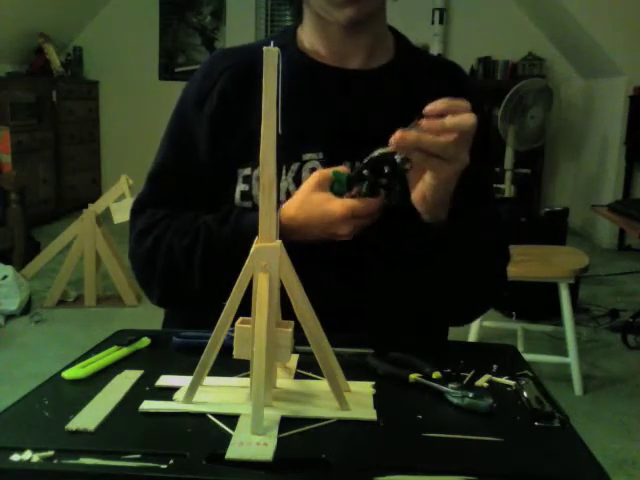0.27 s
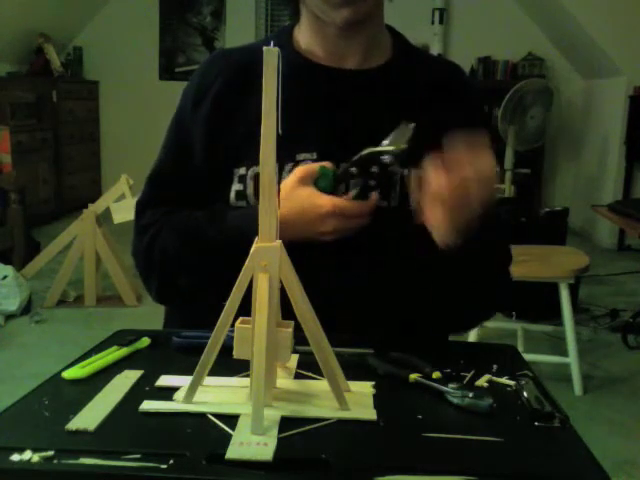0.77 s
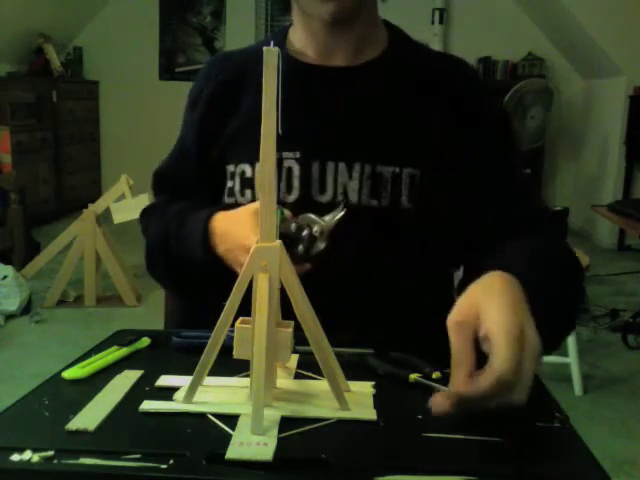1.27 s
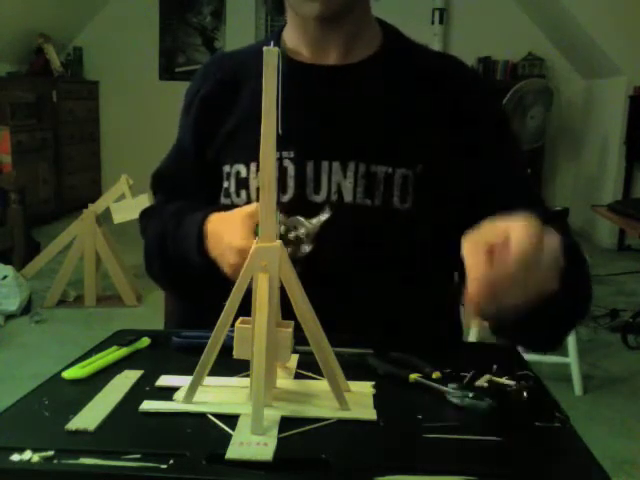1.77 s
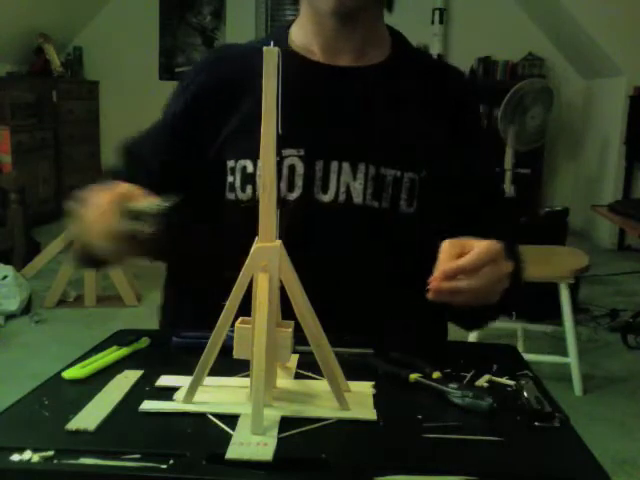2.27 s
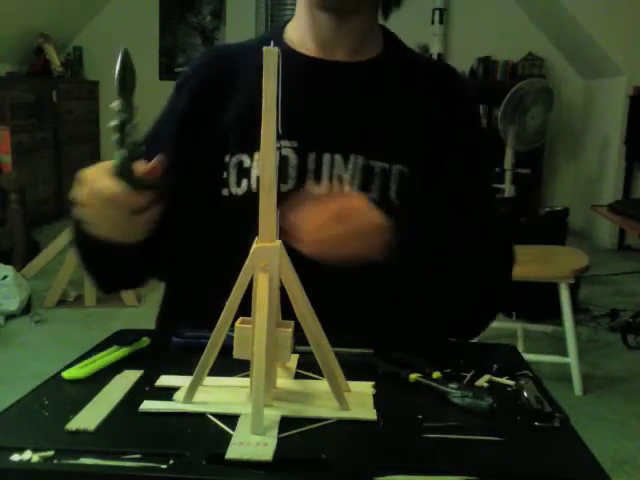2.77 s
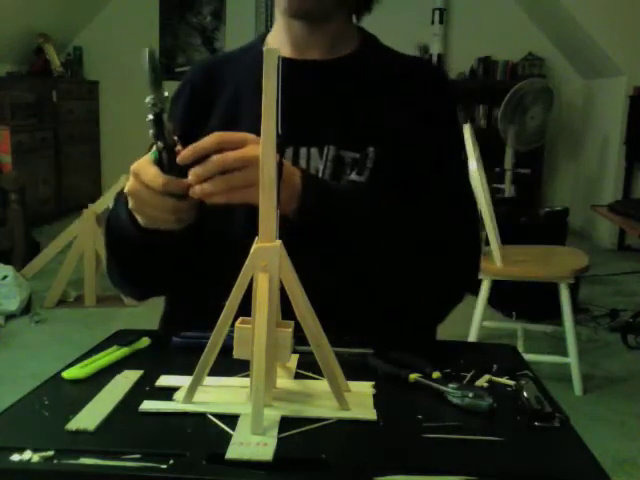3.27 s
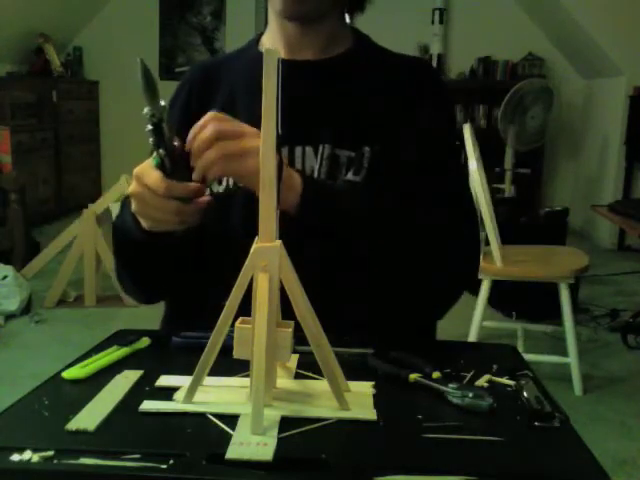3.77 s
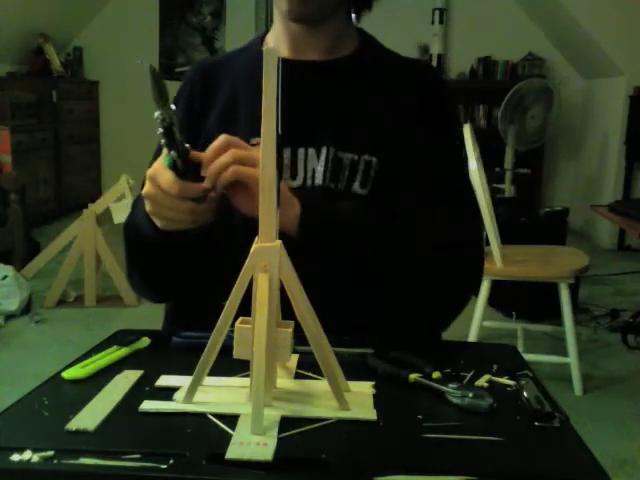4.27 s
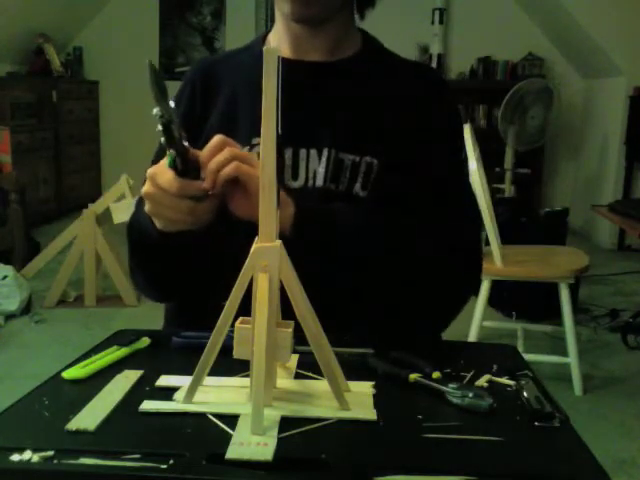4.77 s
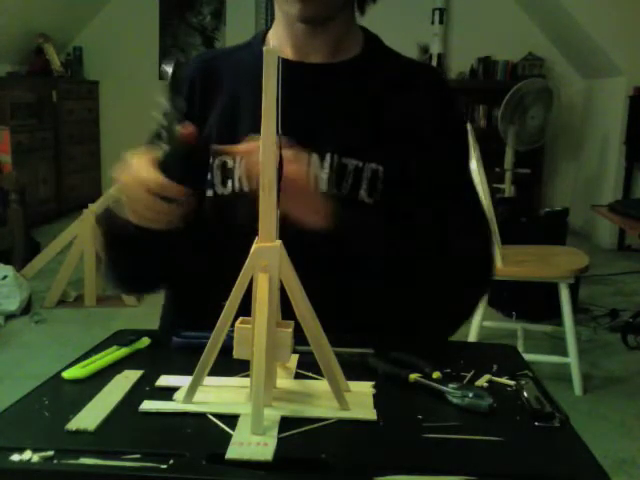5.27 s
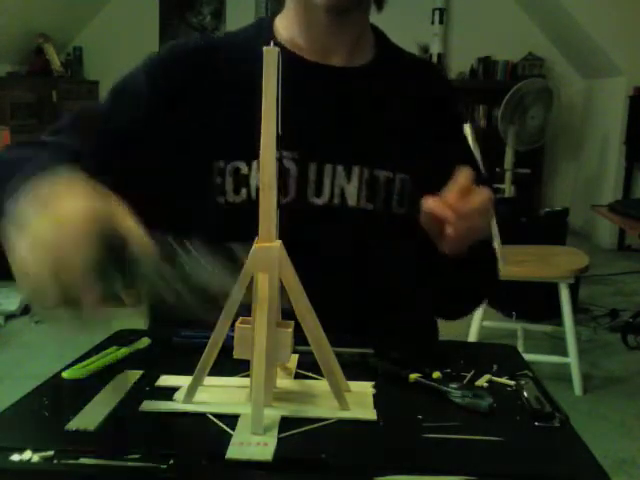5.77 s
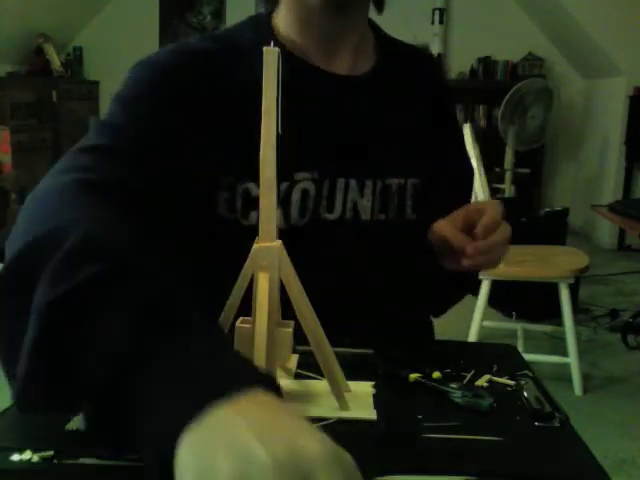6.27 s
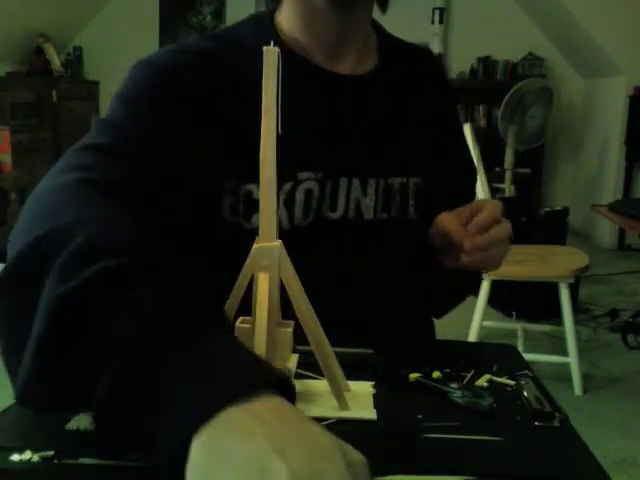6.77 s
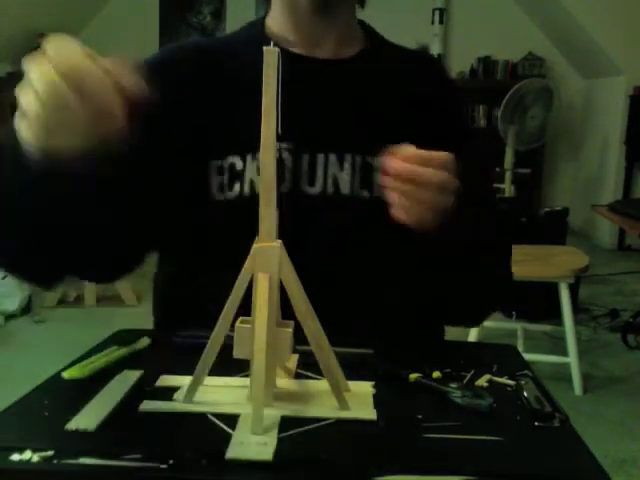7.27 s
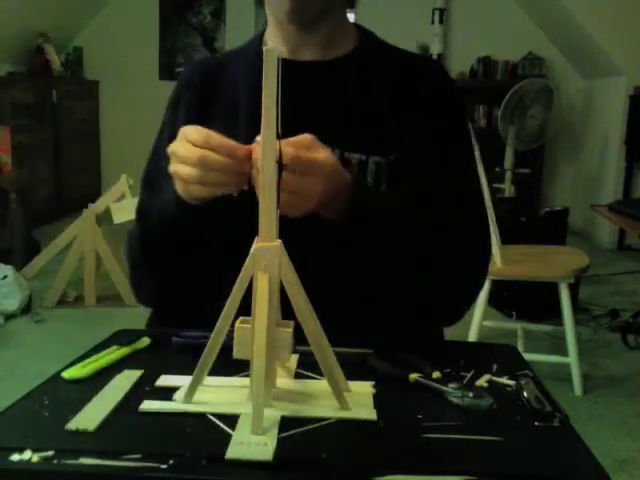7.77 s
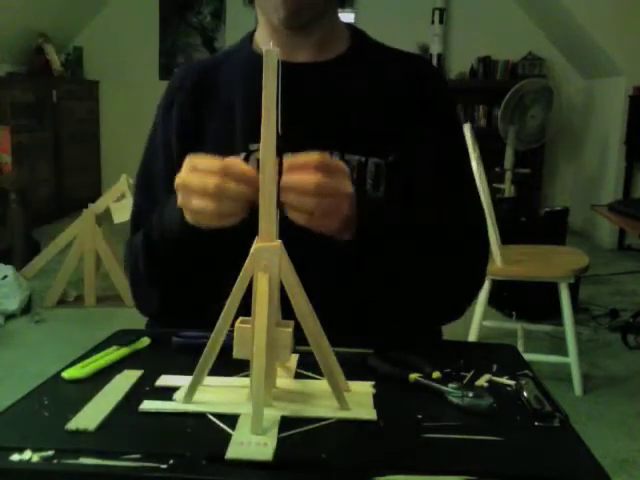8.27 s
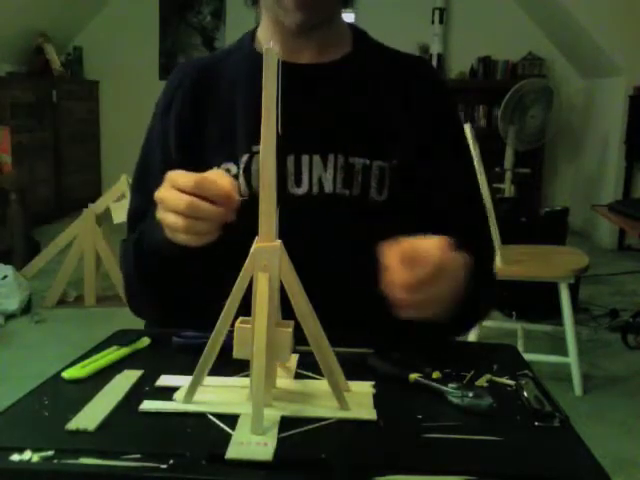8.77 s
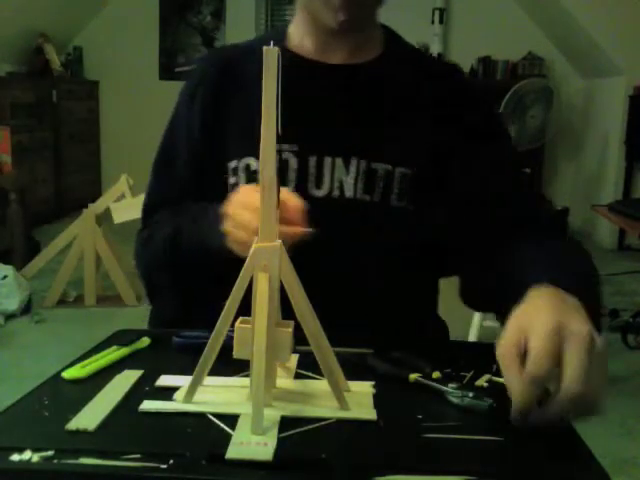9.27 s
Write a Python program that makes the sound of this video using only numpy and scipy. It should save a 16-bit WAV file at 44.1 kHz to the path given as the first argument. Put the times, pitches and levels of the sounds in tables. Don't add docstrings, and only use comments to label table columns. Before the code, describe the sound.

In a small quiet room, close to a mono microphone, tin snips are handled with sharp steel clicks, dull handle taps and faint rubbing of fingers and cloth. After several sparse snaps they are set on the table in two loud woody knocks, jaws then handles. Quiet fumbling follows, a brief sleeve hiss, then a thin wire offcut ticks and bounces to rest.

```python
import sys
import numpy as np
from scipy import signal
from scipy.fft import rfft, irfft
from scipy.io import wavfile
from scipy.ndimage import uniform_filter1d

SR = 44100
rng = np.random.default_rng(int(sys.argv[2]) if len(sys.argv) > 2 else 0)


def log_audio(samples):
    frames = np.atleast_2d(samples).T
    limited = np.clip(frames, -1, 1)
    pcm = np.round(limited * 32767).astype(np.int16)
    wavfile.write(sys.argv[1], SR, pcm)


def attenuation_scalar(level_db):
    decades = np.asarray(level_db, float) / 20
    return 10 ** decades


N = 419391
SPAN = 16384


def jaw_knocks():
    # (time [s], ring level [dB], clatter level [dB], clatter decay [s])
    jaw_hits = [
        (6.3456, -2.5, -8, 0.028),
    ]
    # (frequency [Hz], level [dB], t60 [s])
    jaw_modes = [(175.4, -15, 0.059), (303.6, -7, 0.11), (420, -15, .05), (530, -2.5, 0.072),
                 (795, -1, 0.023), (1135, -12, 0.063), (1340, -2.5, 0.027), (1517, -15.5, 0.073),
                 (1860, -17, 0.046), (2180, -13.5, .04), (2500, -13, 0.014), (3130, -20.5, .03)]
    # (frequency [Hz], level [dB per Hz])
    jaw_spectrum = [(60, -51.5), (300, -27), (900, -12), (1600, -15.5), (2500, -20), (4000, -24.5),
                    (6500, -40.5), (12000, -46.5), (16000, -60)]
    return knocks(jaw_hits, jaw_modes, jaw_spectrum)


def handle_knocks():
    # (time [s], ring level [dB], clatter level [dB], clatter decay [s])
    handle_hits = [
        (6.6065, -48, -53.5, 0.036),
        (6.6212, -7, -1.5, 0.016),
        (6.6578, -20.5, -25, .03),
    ]
    # (frequency [Hz], level [dB], t60 [s])
    handle_modes = [(117.7, -0.5, 0.018), (197.6, 0.5, 0.08), (330, 3, 0.034), (395, -6, 0.056),
                    (538, 1.5, 0.073), (807.4, 6.5, 0.061), (1052.4, 7.5, 0.034), (1286, 0.5, 0.065),
                    (1617, -4, .04), (1797, -11, 0.03), (2140, -15.5, .04), (2530, -17.5, 0.031),
                    (3118, -15.5, .03), (4230, -24, 0.024)]
    # (frequency [Hz], level [dB per Hz])
    handle_spectrum = [(60, -64.5), (300, -30), (900, -24), (1600, -14.5), (2900, -22), (3800, -32),
                       (4500, -29), (6300, -40.5), (12000, -50.5), (16000, -60.5)]
    return knocks(handle_hits, handle_modes, handle_spectrum)


def knocks(rows, modes, spectrum):
    ring, clatter = np.zeros((2, N))
    spectrum_db = read(spectrum, np.fft.rfftfreq(SPAN, 1 / SR))
    t = np.arange(SPAN) / SR
    body = np.zeros(SPAN)
    for hz, db, t60 in modes:
        decay = attenuation_scalar(db - 60 * t / np.clip(t60, .01, .07))
        body += decay * np.sin(2 * np.pi * (hz * t + rng.random()))
    body *= 1 - np.exp(-t / 0.0011)
    for s, ring_db, clatter_db, decay in rows:
        add(ring, s, attenuation_scalar(ring_db) * body)
        noise = rng.standard_normal(SPAN)
        add(clatter, s, burst(noise, clatter_db, spectrum_db, decay, rise=0.00035))
    return ring, clatter


def steel():
    # (time [s], peak level [dB], centre frequency [Hz], reach below [octaves])
    clicks = [(0.1534, -38, 5180, 1.1), (0.169, -39, 5280, 1.6), (1.1802, -47, 4710, 1.3),
              (1.3294, -36, 12900, 2.2), (1.3855, -13, 10900, 1.17), (1.4366, -21, 9700, 0.59),
              (1.5486, -36.5, 9050, 1.5), (2.0079, -23.5, 4460, 3.2), (2.5247, -36, 4950, 4.4),
              (4.0708, -31.5, 5300, 4.7), (4.7208, -25.5, 5870, 0.72), (5.558, -30, 9020, 3),
              (5.571, -38, 5300, 2.2), (5.7049, -48, 8760, 1.2), (5.8675, -43, 9000, 0.41),
              (8.3, -42, 9560, 2.5), (8.7241, -43.5, 10920, 0.72), (9.411, -34, 9000, 3.3),
              (9.466, -50, 10200, 0.7)]
    # (time [s], peak level [dB], spread [octaves])
    taps = [
        (0.0967, -18, 2.7),
        (1.3047, -37.5, 1.43),
        (1.3857, -28.5, 0.89),
        (1.4378, -27.5, 1.8),
        (1.4614, -32, 1.9),
        (1.494, -38, 1.5),
        (2.508, -40.5, 0.77),
    ]
    reach_above_oct, click_decay_s = 1.05, 0.01
    tap_hz, tap_decay_s = 2700, .0075
    rows = [(s, db, hz, below, reach_above_oct, click_decay_s) for s, db, hz, below in clicks]
    rows += [(s, db, tap_hz, spread, spread, tap_decay_s) for s, db, spread in taps]
    return contacts(rows, grain_db=2.5, rise_share=.004, strike=26., lag=.0005)


def offcut():
    # (time [s], peak level [dB])
    bounces = [
        (9.2387, -16.5),
        (9.2550, -17.5),
        (9.2630, -31),
        (9.2671, -24),
        (9.2886, -36),
        (9.3046, -29),
        (9.3087, -26.5),
        (9.3138, -32),
        (9.3184, -32),
        (9.3254, -38),
    ]
    hz, below_oct, above_oct, decay_s = 6480, 2.6, 1.07, 0.0069
    rows = [(s, db, hz, below_oct, above_oct, decay_s) for s, db in bounces]
    return contacts(rows, grain_db=2.5, rise_share=.004, strike=20., lag=.0006)


def ringing():
    # (time [s], peak level [dB], frequency [Hz], decay [s])
    pings = [
        (.0972, -23, 2850, .025),
        (2.0074, -32, 5250, .006),
        (4.7215, -36, 5650, .008),
        (4.7214, -28.5, 10400, .008),
    ]
    # (time [s], peak level [dB], frequency [Hz], spread [octaves])
    rings = [(0.0968, -32.5, 1154, 0.17), (0.1034, -49, 2880, 0.077), (1.041, -56, 5000, .07),
             (1.05, -48, 2900, 0.14), (1.051, -48.5, 9430, .04), (1.116, -56, 4810, .08),
             (1.117, -59, 11400, .05), (1.978, -47, 3020, .3), (4.068, -46, 5570, .2),
             (4.729, -49, 5700, .03), (4.7292, -46, 10600, .16), (4.7294, -50, 15210, .05),
             (5.244, -48, 2840, 0.14), (5.561, -51, 10840, .04), (6.291, -62, 5110, .04),
             (6.510, -50, 776, 0.14), (8.765, -50.5, 2550, 0.18)]
    # (time [s], peak level [dB], frequency [Hz], decay [s])
    sings = [
        (1.331, -64, 13010, .12),
        (6.635, -46, 11550, .14),
        (9.2395, -47, 12450, 0.14),
        (9.2555, -53, 14070, 0.09),
        (9.267, -51, 14335, .22),
    ]
    # (time [s], peak level [dB], frequency [Hz], spread [octaves], decay [s])
    thuds = [(0.098, -30, 1980, 0.87, .03), (6.622, -27, 125, 0.62, .07), (6.622, -14, 349, 0.45, .05),
             (6.347, -20, 2600, .8, 0.027), (2.04, -51, 291, 0.13, 0.38), (6.508, -41.5, 330, 1.2, 0.033),
             (6.776, -34.5, 460, .6, .03), (7.325, -55, 298, 0.15, 0.47), (7.9196, -43, 88.5, .7, 0.06),
             (7.919, -41, 150.4, 0.23, 0.19), (7.921, -37.5, 330, 0.77, 0.15)]
    ping_oct, sing_oct, ring_decay_s = 0.13, 0.01, .12
    snaps = [(s, db, hz, ping_oct, ping_oct, decay) for s, db, hz, decay in pings]
    rows = [(s, db, hz, spread, spread, ring_decay_s) for s, db, hz, spread in rings]
    rows += [(s, db, hz, sing_oct, sing_oct, decay) for s, db, hz, decay in sings]
    rows += [(s, db, hz, spread, spread, decay) for s, db, hz, spread, decay in thuds]
    struck = contacts(snaps, grain_db=1.8, rise_share=0.0018, strike=30.)
    return struck + contacts(rows, grain_db=1.5, rise_share=0.014, strike=0)


def rubbing():
    # (time [s], peak level [dB], decay [s])
    slips = [(0.2354, -43, 0.065), (0.2842, -48, 0.044), (0.334, -52.5, 0.035), (1.0294, -51, 0.06),
             (1.045, -43, 0.076), (1.988, -49, 0.037), (1.996, -43, 0.013), (2.559, -51, 0.13),
             (2.8664, -41.5, 0.055), (3.622, -40.5, 0.057), (3.82, -54.5, 0.06), (4.064, -47, 0.06),
             (4.4224, -46.5, 0.065), (4.455, -41, 0.076), (4.826, -44, 0.06), (4.857, -47, 0.052),
             (5.086, -51.5, 0.055), (5.216, -50, 0.056), (5.5224, -47.5, 0.052), (5.9737, -44.5, 0.05),
             (6.143, -48.5, 0.024), (7.9163, -36, 0.05), (7.9239, -32.5, 0.068), (8.7882, -50.5, 0.093)]
    # (time [s], peak level [dB], centre frequency [Hz])
    brushes = [(0.4425, -43, 7100), (0.4744, -47, 12500), (0.759, -43, 6400), (1.109, -47, 7710),
               (2.237, -47, 7450), (2.446, -53, 9000), (2.6507, -47.5, 7900), (2.7377, -52, 8450),
               (3.74, -51.5, 7790), (4.8994, -52, 8030), (5.4694, -56, 10200), (5.878, -50, 8940)]
    # (time [s], peak level [dB], centre frequency [Hz], spread [octaves])
    rustles = [(1.057, -43, 1640, 1.04), (1.385, -38.5, 875, 1.35), (2.275, -41, 2180, 1.57),
               (2.614, -45, 1280, 0.89), (2.651, -44.5, 1290, 1.37), (2.866, -41.5, 1230, 1.2),
               (2.953, -46, 1000, 1.9), (3.611, -40.5, 1390, 1.5), (3.665, -41, 1090, 1.57),
               (4.455, -43, 900, 1.3), (4.899, -47, 1100, 1.55), (5.554, -35.5, 2050, 1.6),
               (6.293, -43.5, 2500, 2.6), (6.578, -44, 750, 1.54), (7.609, -51.5, 620, 1.2),
               (7.916, -37, 720, 2.14)]
    slip_hz, slip_oct = 5320, 1
    brush_below_oct, brush_above_oct, brush_decay_s = 0.93, 0.64, 0.053
    rustle_decay_s = .075
    rows = [(s, db, slip_hz, slip_oct, slip_oct, decay) for s, db, decay in slips]
    rows += [(s, db, hz, brush_below_oct, brush_above_oct, brush_decay_s) for s, db, hz in brushes]
    rows += [(s, db, hz, spread, spread, rustle_decay_s) for s, db, hz, spread in rustles]
    return contacts(rows, grain_db=2.5, rise_share=.13, strike=0)


def sleeve():
    # (time [s], level [dB])
    stroke = [
        (8.78, -83),
        (8.806, -70.5),
        (8.822, -66.5),
        (8.932, -60),
        (9.07, -66),
        (9.12, -88),
    ]
    s, db = np.transpose(stroke)
    highpass = signal.butter(2, 4500, "high", fs=SR, output="sos")
    hiss = signal.sosfilt(highpass, rng.standard_normal(N))
    return evened(hiss) * attenuation_scalar(np.interp(np.arange(N) / SR, s, db, left=-120, right=-120))


def contacts(rows, grain_db, rise_share, strike, lag=0):
    out = np.zeros(N)
    bins_hz = np.fft.rfftfreq(SPAN, 1 / SR) + 1
    for s, db, centre, below, above, decay in rows:
        grains = rng.standard_normal(SPAN) * attenuation_scalar(grain_db * rng.exponential(1, SPAN))
        grains[1] += strike
        octaves = np.log2(bins_hz / centre)
        reach = np.maximum(np.where(octaves < 0, below, above), .005)
        hump_db = -6 * (octaves / reach) ** 2
        add(out, s + lag, burst(grains, db, hump_db, decay, rise_share * decay))
    return out


def burst(noise, db, colour_db, decay, rise):
    t = np.arange(SPAN) / SR
    swell = 1 - np.exp(-t / max(rise, 1e-5))
    shape = swell * attenuation_scalar(-60 * t / max(decay, 1e-4))
    fade_out = signal.windows.tukey(2 * SPAN, .5)[SPAN:]
    sound = coloured(noise * shape, colour_db) * fade_out
    return attenuation_scalar(db) * sound / abs(sound).max()


def coloured(x, colour_db):
    cepstrum = irfft(np.log(attenuation_scalar(np.maximum(colour_db, -80))))
    cepstrum[1:len(x) // 2] *= 2
    cepstrum[len(x) // 2 + 1:] = 0
    return irfft(rfft(x) * np.exp(rfft(cepstrum)), len(x))


def read(points, hz):
    f, value = np.transpose(points)
    return np.interp(np.log(hz + 1), np.log(f + 1), value)


def evened(x):
    return x / np.sqrt(np.mean(x ** 2) + 1e-20)


def add(mix, s, sound):
    part = mix[round(s * SR):][:len(sound)]
    part += sound[:len(part)]


def table_top(x, db, size):
    again = np.roll(x, size)
    return x + attenuation_scalar(db) * (again + 0.25 * np.roll(again, size))


def room(x, near, tail_db):
    # (frequency [Hz], t60 [s])
    decay_times = [(100, .3), (500, 0.25), (1500, 0.3), (4000, 0.24), (9000, 0.2635), (15000, 0.14)]
    # (delay [s], level [dB])
    walls = [(.0082, -9), (.0135, -21), (.0166, -15), (.025, -22)]
    hz, t, z = signal.stft(rng.standard_normal(SR // 2), SR, nperseg=256)
    decay = attenuation_scalar(-60 * t / read(decay_times, hz)[:, None])
    tail = signal.istft(z * decay, SR, nperseg=256)[1]
    tail *= 1 - np.exp(-(np.arange(len(tail)) / SR / .011) ** 2)
    echoes = np.zeros(2000)
    echoes[0] = 1
    for delay, db in walls:
        scatter = np.exp(-np.arange(60) / 20) * rng.standard_normal(60) * .2
        scatter[0] = 1
        add(echoes, delay, attenuation_scalar(db) * scatter)
    wet = signal.fftconvolve(x, tail * attenuation_scalar(tail_db) / np.linalg.norm(tail))
    return signal.fftconvolve(near, echoes)[:N] + wet[:N]


def air():
    # (frequency [Hz], level [dB per Hz])
    tone = [(15, -89.5), (25, -10.5), (108, -0.5), (236, -2), (277, -4.5), (344, -5.5), (405, -7),
            (545, -6.5), (714, -2), (818, -7.5), (1440, -11.5), (1790, -16.5), (2350, -14), (4140, -21),
            (16000, -26)]
    # (frequency [Hz], width [Hz], level [dB])
    fan_bands = [(1806, 150, 8.5), (3140, 350, 3), (2360, 67, -4)]
    # (frequency [Hz], level [dB])
    hum = [(118.4, -76), (4000, -88), (12059, -92)]
    tone_db = -59
    frames, hz = N // 256 + 5, np.fft.rfftfreq(1024, 1 / SR)
    a, b, patches = rng.standard_normal((frames, 513, 3)).T
    patches = evened(uniform_filter1d(uniform_filter1d(patches, 20, 0), 30, 1))
    humps_db = sum(db * np.exp(-((hz - f) / width) ** 2) for f, width, db in fan_bands)
    z = (a + 1j * b) * attenuation_scalar((read(tone, hz) + humps_db)[:, None] + .5 * patches)
    noise = signal.istft(z, nperseg=1024, noverlap=768)[1][:N]
    t = np.arange(N) / SR
    lines = sum(np.sqrt(2) * attenuation_scalar(db) * np.sin(2 * np.pi * f * t) for f, db in hum)
    return attenuation_scalar(tone_db) * evened(noise) + lines


def scene():
    hand_lag, table_lag = 17, 18
    jaw_ring, jaw_clatter = jaw_knocks()
    handle_ring, handle_clatter = handle_knocks()
    mono = air()
    board = jaw_ring + 0
    clatter = jaw_clatter + 0
    board += handle_ring
    clatter += handle_clatter
    mono += room(board, board, -18) + room(clatter, clatter, -17)
    hard, wire, soft = steel(), offcut(), rubbing() + ringing()
    mono += room(hard, table_top(hard, -4.5, hand_lag), -5.5)
    mono += room(soft, soft, -8)
    mono += room(wire, table_top(wire, -6.5, table_lag), -7.5)
    mono += table_top(sleeve(), -9.5, table_lag)
    return np.array([mono, mono])


def top_cut(x):
    return signal.sosfilt(signal.butter(12, 16820, fs=SR, output="sos"), x)


def record(dry):
    edge_hz = 15900
    cut = signal.sosfilt(signal.butter(2, 55, "high", fs=SR, output="sos"), dry)
    lowpass = signal.firwin(767, edge_hz, window=("kaiser", 7), fs=SR)
    cut = signal.oaconvolve(cut, lowpass[None], "same")
    overloaded = 1.013 * np.tanh(cut / 0.92)
    loud = signal.sosfilt(signal.butter(2, 45, "high", fs=SR, output="sos"), overloaded)
    flutter = uniform_filter1d(rng.standard_normal(dry.shape), size=30)
    grit = np.diff(loud, prepend=0) * flutter * attenuation_scalar(-12.0)
    return top_cut(loud + grit)


dry = scene()
out = record(dry)
log_audio(out)
```